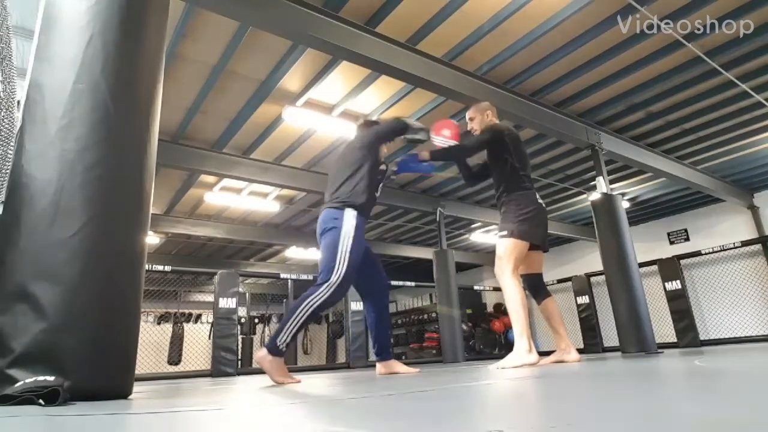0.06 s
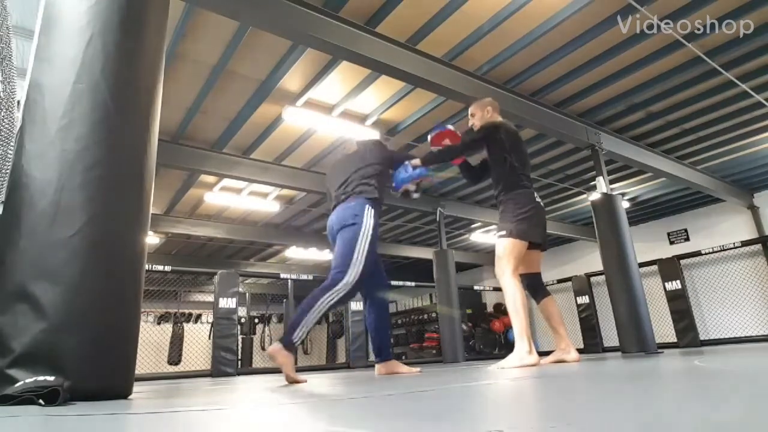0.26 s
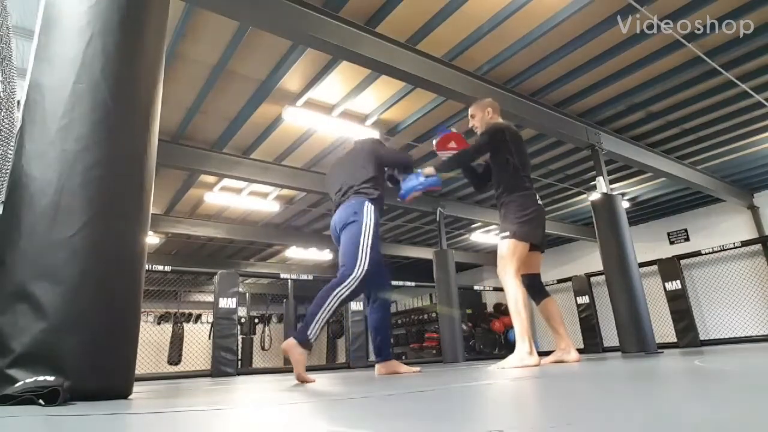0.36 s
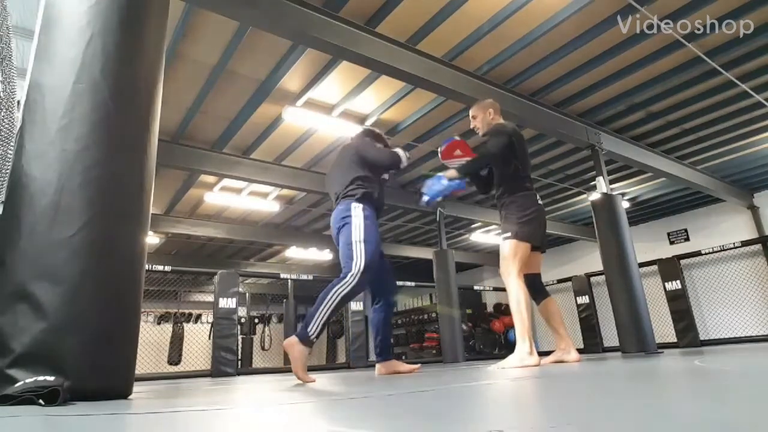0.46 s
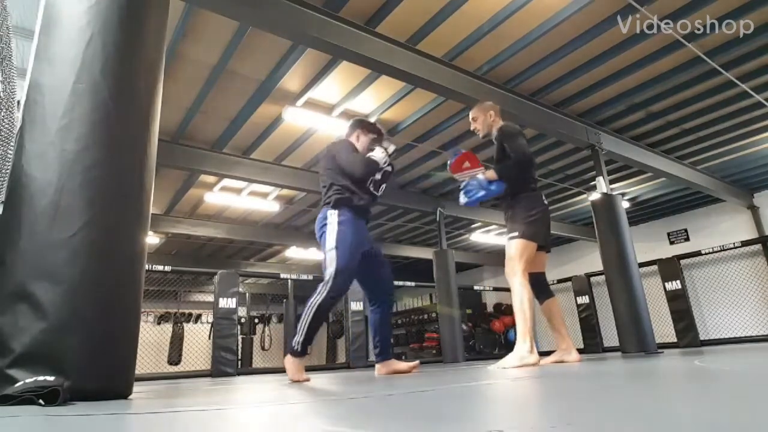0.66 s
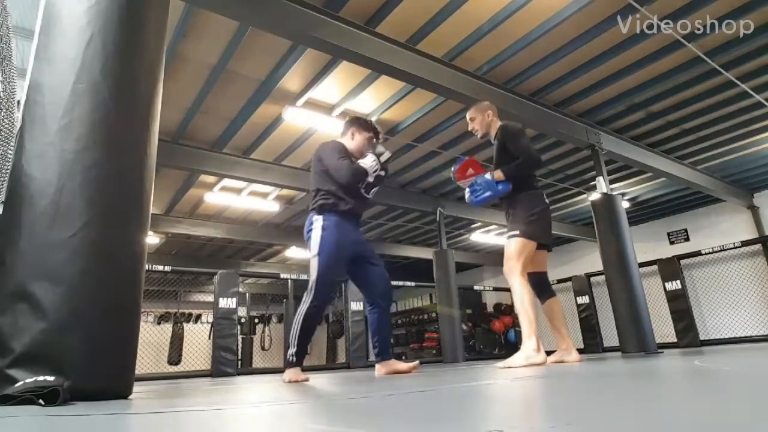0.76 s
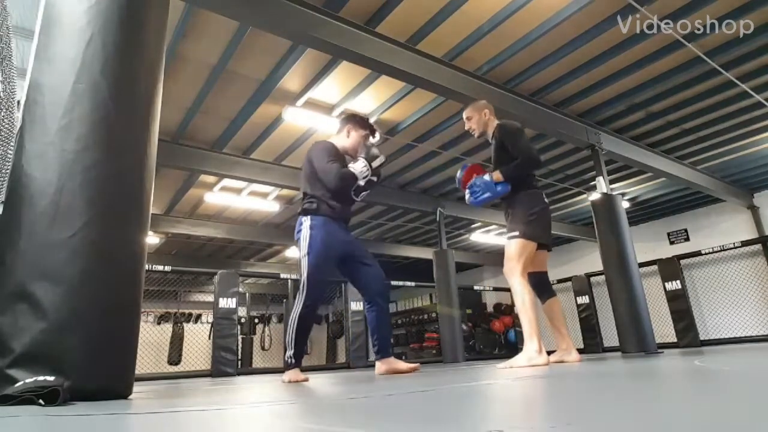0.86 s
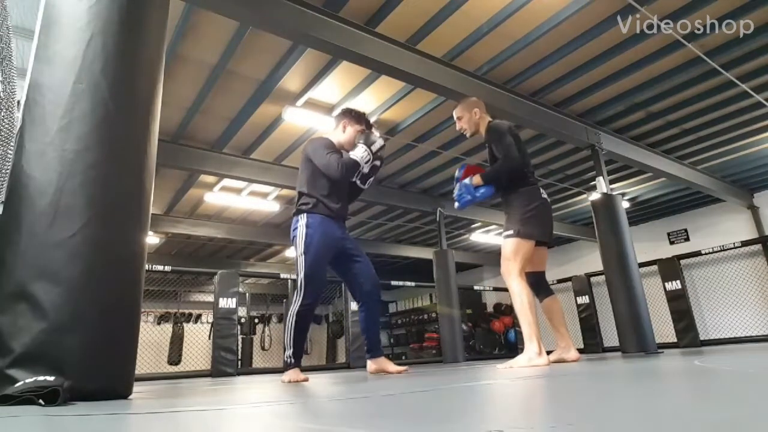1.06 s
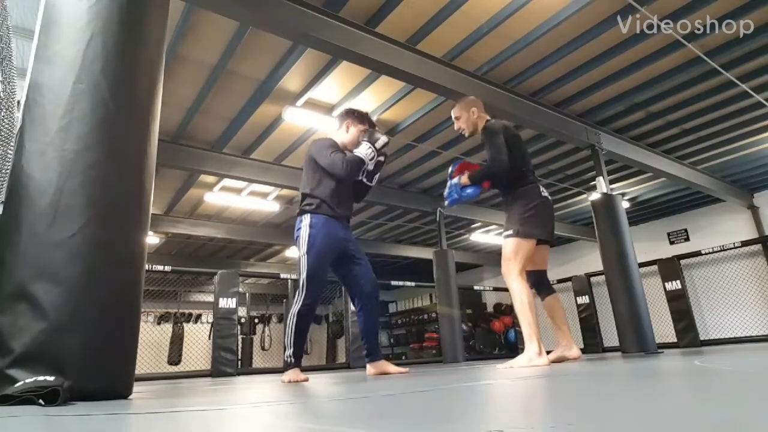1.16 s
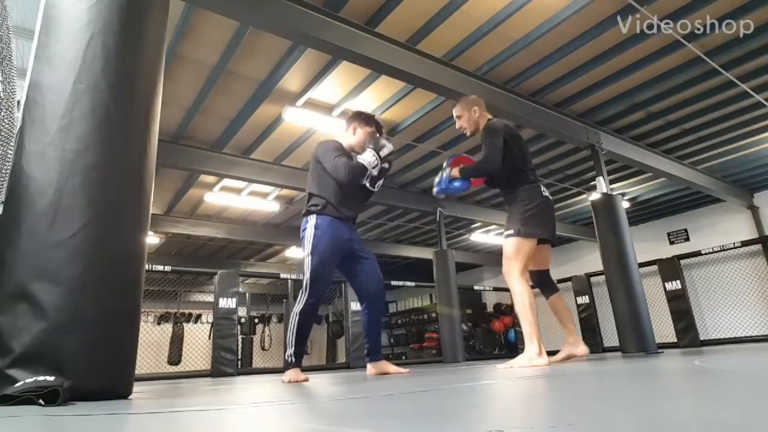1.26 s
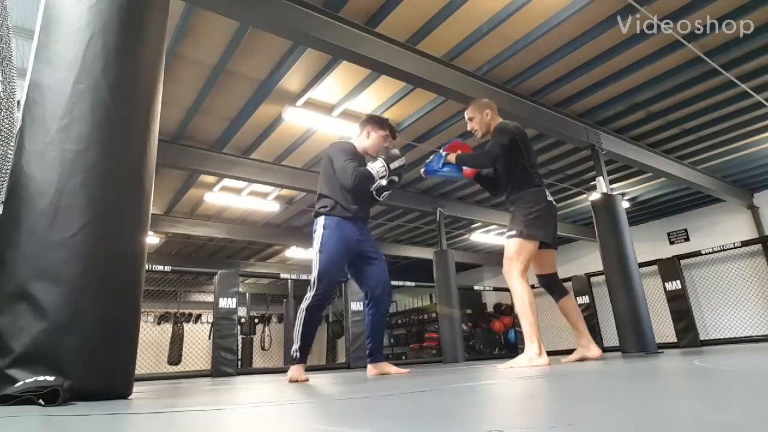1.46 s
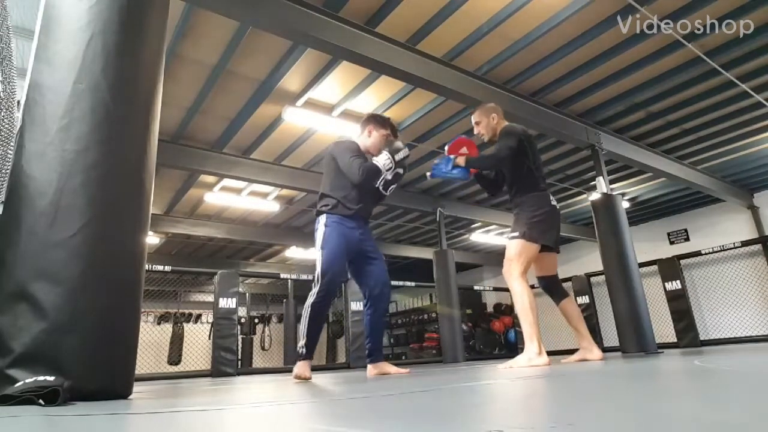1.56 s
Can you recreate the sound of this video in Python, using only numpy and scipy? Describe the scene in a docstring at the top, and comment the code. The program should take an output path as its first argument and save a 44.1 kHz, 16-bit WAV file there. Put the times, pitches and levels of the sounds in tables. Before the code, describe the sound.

A boxing glove smacks once into a padded mitt in an echoing gym, amid soft footwork.

```python
"""Bare feet pad and slide on a mat and clothes rustle over the low room noise of a large gym.
Then a boxing glove smacks once into a padded focus mitt, a few metres from a close pair of microphones
on the floor. The leather cracks, trapped air pops and the pad thumps; the roof throws the blow back and
the hall rings out. The footwork goes on, soles squeak, and the glove gives the mitt one light tap."""
import sys
import numpy as np
from scipy import signal
from scipy.fft import rfft, irfft
from scipy.io import wavfile
from scipy.ndimage import uniform_filter1d

SR = 44100
rng = np.random.default_rng(int(sys.argv[2]) if len(sys.argv) > 2 else 0)


def pcm_store(signal):
    """Save signal as 16-bit PCM."""
    levels = np.round(np.clip(np.atleast_2d(signal), -1, 1) * 32767)
    wavfile.write(sys.argv[1], SR, levels.astype(np.int16).T)


N = 70560
T = np.arange(N) / SR

# How alike the two microphones hear the room: freq_hz, correlation
MIC_LIKENESS = [(40, 1), (125, 0.85), (250, 0.91), (500, 0.66), (1000, 0.13), (2000, 0.09), (5000, 0),
                (16000, 0.13)]
# Balance of the pair: freq_hz, left_minus_right_db
MIC_BALANCE = [(60, 1.5), (250, 0.9), (1000, -.6), (2200, -2.5), (4000, -3), (8000, -2.2), (16000, 1.5)]
# Room noise and the hall's low drone: freq_hz, relative_db
ROOM_SPECTRUM = [(20, -16), (45, -2.5), (85, -4.5), (140, -3.5), (200, -6.5), (280, -4.5), (440, -17),
                 (620, -14), (1000, -23), (1350, -23), (1600, -32), (2100, -27.5), (3500, -35),
                 (6000, -41.5), (10000, -45.5), (15500, -39.5)]
DRONE_SPECTRUM = [(20, -25), (60, -12.5), (86, 0), (110, -11), (250, -45), (16000, -92)]
# Shifts of the body: centre_s, width_s, cloth_db, sole_rub_db
BODY_SHIFTS = [(0.009, 0.042, -58.5, -49), (0.112, .04, -61, -58), (0.193, 0.026, -60.5, -54.5),
               (0.843, .014, -62, -60), (0.918, 0.03, -66, -60.5), (1.031, 0.024, -70, -60.5),
               (1.104, 0.012, -89, -57.5), (1.212, 0.024, -67, -57.5), (1.307, 0.034, -80, -55),
               (1.353, 0.022, -59, -69), (1.434, 0.038, -62.5, -75), (1.513, 0.035, -55.5, -56.5),
               (1.59, 0.032, -61, -74)]
# Friction of cloth, and of soles on the mat: freq_hz, relative_db
CLOTH_SPECTRUM = [(100, -18), (500, 1.5), (1100, 8), (1700, -1), (3200, -1.5), (5500, -8.5), (11000, -13.5),
                  (16000, -16.5)]
RUB_SPECTRUM = [(150, -15), (420, -5.5), (660, -0.5), (850, -8), (1300, -14.5), (1700, -29), (16000, -57)]
# Footfalls on the mat: start_s, thud_db, pat_db, pat_hz, tick_db
FOOTFALLS = [(.006, -51, -42, 726, -52), (.021, -53, -40, 550, -68), (.085, -60, -41, 520, -73),
             (.832, -55, -40, 640, -53), (.844, -71, -46.5, 850, -58.5), (.849, -63, -40, 613, -72),
             (1.094, -54.5, -48.5, 560, -76), (1.1025, -63.5, -40, 676, -72),
             (1.206, -43.5, -44, 636, -53.5), (1.217, -48.5, -52, 674, -70), (1.4695, -60, -41, 922, -64),
             (1.4875, -45, -41, 883, -55), (1.4945, -59, -43.5, 1050, -58.5), (1.502, -56, -46.5, 590, -63),
             (1.528, -72, -41.5, 424, -52), (1.543, -46, -62, 602, -73), (1.5745, -56, -44.5, 1137, -68)]
# A footfall's thud and its tick of skin: freq_hz, relative_db
THUD_SPECTRUM = [(20, -32), (50, 2.5), (110, -15), (260, 1), (500, -15.5), (1500, -42), (16000, -85)]
TICK_SPECTRUM = [(300, -41), (1500, -9), (3000, 1.5), (5000, -17), (11000, -9), (16000, -15.5)]
# Squeaks of skin on vinyl: centre_s, pitch_hz, level_db
SOLE_SQUEAKS = [(1.22, 3620, -62), (1.33, 5800, -61.5), (1.342, 5100, -65)]
# The blow as the hall returns it: freq_hz, relative_db
HALL_SPECTRUM = [(25, -18), (65, -2.5), (105, -4.5), (135, 1), (200, -3), (400, -1.5), (520, -7.5),
                 (720, -9.5), (900, -0.5), (1300, -8.5), (1600, -23.5), (2100, -23), (3600, -25),
                 (4600, -30), (8000, -32), (12500, -35.5), (16000, -39)]
# Decay of the hall's main tail: freq_hz, t60_s
HALL_DECAY = [(60, 1), (140, 0.73), (400, 0.53), (900, 0.41), (2000, 0.62), (4000, 0.63), (8000, 0.47),
              (14000, 0.28)]
# Low modes of the hall: pitch_hz, level_db, t60_s
HALL_MODES = [(72, -25, .7), (136, -16, .65)]
# Strong roof slap, then the other first reflections: delay_s, level_db, lowpass_hz, right_lag_s
ROOF_SLAP = (.0142, -5.5, 4500, .00002)
EARLY_ECHOES = [(.0062, -16.5, 9000, .00005), (0.0227, -12, 3500, .0001), (0.0285, -18, 3000, -.0001),
                (0.0383, -20, 3000, -0.011)]
# Crack of the leather: freq_hz, relative_db
LEATHER_SPECTRUM = [(300, 3.5), (1000, 10.5), (2500, 6), (3800, 2), (5500, -2), (9000, -7.5), (12500, 1),
                    (16000, -18)]
# Pad and hollow of the mitt: pitch_hz, level_db, t60_s
MITT_MODES = [(136, -14.5, 0.066), (241, -6.5, 0.017), (904, -2, .012), (1830, -30, 0.0091)]

PUNCH_S, TAP_S, TAP_DB = .2442, 1.5205, -37
SLAP_S, POP_AFTER_S, POP_WIDTH_S, CREASE_HZ = .00016, .001285, .00037, 9700
HALL_DB, HALL_BUILD_S, HALL_HOLD_S = -15.5, .013, .036
LATE_DB, LATE_T60_RATIO = -13.5, 2.11  # far corners of the hall ring on longer


def amp(db):
    """Decibels to gain."""
    return 10 ** (np.asarray(db) / 20)


def curve_at(points, hz):
    """Reads a table on a log-frequency axis."""
    freqs, values = np.transpose(points)
    return np.interp(np.log(hz + 1), np.log(freqs + 1), values)


def delayed(x, delay_s):
    """Moves a sound later."""
    return np.interp(T - delay_s, T, x, left=0)


def decay(start_s, fall_s):
    """Sudden start, exponential fall."""
    return (T >= start_s) * np.exp(-np.maximum(T - start_s, 0) / fall_s)


def bell(centre_s, width_s):
    """Smooth rise and fall around a moment."""
    return np.exp(-((T - centre_s) / width_s) ** 2 / 2)


def noise(spectrum, grain_db=0):
    """Coloured, optionally grainy noise at rms 1, as two close microphones hear it in a room."""
    hz = np.fft.rfftfreq(N, 1 / SR)
    white = rng.standard_normal((2, N))
    grain = amp(grain_db * np.repeat(rng.standard_normal(N // 32 + 1), 32)[:N])
    mid, side = rfft(white * grain)
    likeness = np.clip(curve_at(MIC_LIKENESS, hz), -1, 1)
    mid, side = mid * np.sqrt(1 + likeness), side * np.sqrt(1 - likeness)
    lean = amp(curve_at(MIC_BALANCE, hz) / 2)
    pair = np.array([(mid + side) * lean, (mid - side) / lean])
    coloured = irfft(pair * amp(curve_at(spectrum, hz)), N)
    return coloured / np.sqrt(np.mean(coloured ** 2) + 1e-20)


def room_tone():
    """The gym's steady noise and low drone, far under the action."""
    return amp(-52.5) * noise(ROOM_SPECTRUM) + amp(-55.5) * noise(DRONE_SPECTRUM)


def in_hall(x, wet_db=-6.5, t60_s=.5):
    """Adds the hall's tail to the small sounds."""
    tail = noise([(20, 1.5), (5000, -11), (16000, -2.5)]) * amp(-60 * T / t60_s)
    tail /= np.linalg.norm(tail[0])
    return x + amp(wet_db) * signal.fftconvolve(x, tail, axes=1)[:, :N]


def rustle():
    """Grainy friction of cloth and of soles on the mat swells with each movement."""
    cloth = sum(amp(db) * bell(s, width) for s, width, db, _ in BODY_SHIFTS)
    rub = sum(amp(db) * bell(s, width) for s, width, _, db in BODY_SHIFTS)
    return cloth * noise(CLOTH_SPECTRUM, grain_db=2) + rub * noise(RUB_SPECTRUM, grain_db=2)


def squeaks(edge_ratio=1.13 ** 3):
    """A turning sole sticks and slips: brief, fuzzy squeaks of narrow-band noise."""
    out = np.zeros((2, N))
    for centre_s, hz, db in SOLE_SQUEAKS:
        band = [(hz / edge_ratio, -45), (hz, 0), (hz * edge_ratio, -45)]
        out += amp(db) * noise(band) * bell(centre_s, width_s=.0021)
    return out


def feet():
    """Each footfall is a soft thud, a hollow pat of a few cycles and a tick of skin on vinyl."""
    thud, pat, tick = np.zeros((3, N))
    for start_s, thud_db, pat_db, pat_hz, tick_db in FOOTFALLS:
        thud += amp(thud_db) * decay(start_s, fall_s=.013)
        hollow = np.sin(2 * np.pi * pat_hz * (start_s - T))
        pat += amp(pat_db) * bell(start_s + .00092, width_s=.001) * hollow
        tick += amp(tick_db) * (decay(start_s, fall_s=.0024) - decay(start_s, fall_s=.00035))
    soft_thud = uniform_filter1d(thud, size=130)
    return soft_thud * noise(THUD_SPECTRUM) + pat + tick * noise(TICK_SPECTRUM)


def reflections(x):
    """Dulled copies of a blow reach the microphones from roof, bags and walls."""
    out = np.zeros((2, N))
    for delay_s, db, lowpass_hz, right_lag_s in [ROOF_SLAP, *EARLY_ECHOES]:
        pole = np.exp(-2 * np.pi * lowpass_hz / SR)
        left, right = amp(db) * signal.lfilter([1 - pole], [1, -pole], x)
        out += [delayed(left, delay_s), delayed(right, delay_s + right_lag_s)]
    return out


def hall_ring(boom_rise_s=.014):
    """The diffuse tail builds, holds briefly and dies band by band over two low modes."""
    hz, t, bands = signal.stft(noise(HALL_SPECTRUM, grain_db=2), SR, nperseg=512, noverlap=384)
    fall_db = -60 * np.maximum(t - HALL_HOLD_S, 0) / curve_at(HALL_DECAY, hz)[:, None]
    bands *= np.hypot(amp(fall_db), amp(LATE_DB + fall_db / LATE_T60_RATIO))
    tail = signal.istft(bands, SR, nperseg=512, noverlap=384)[1][:, :N]
    build = 1 - np.exp(-(T / HALL_BUILD_S) ** 2)
    boom = sum(amp(db - 60 * T / t60) * np.sin(2 * np.pi * (mode_hz * T + rng.random()))
               for mode_hz, db, t60 in HALL_MODES)
    return amp(HALL_DB) * tail * build + boom * (1 - np.exp(-T / boom_rise_s))


def smack(pad_rise_s=.00023):
    """The covers slap, the air between them pops out, the pad rings, the leather cracks and creases."""
    slap_time, pop_time = T / SLAP_S, (T - POP_AFTER_S) / POP_WIDTH_S
    slap = -amp(-9.5) * slap_time ** 2 * np.exp(2 * (1 - slap_time))
    pop = amp(-3.5) * pop_time * np.exp((1 - pop_time ** 2) / 2)
    modes = sum(amp(db - 60 * T / t60) * np.sin(2 * np.pi * hz * T) for hz, db, t60 in MITT_MODES)
    pad = delayed(modes * (1 - np.exp(-T / pad_rise_s)), POP_AFTER_S)
    crack, crush = amp(-15.5) * decay(0, fall_s=.001), amp(-28) * decay(0, fall_s=.014)
    leather = noise(LEATHER_SPECTRUM) * (crack + crush)
    crease_band = [(CREASE_HZ / 2, -18), (CREASE_HZ, 0), (CREASE_HZ * 2, -18)]
    crease = amp(-26) * bell(centre_s=.0077, width_s=.0011) * noise(crease_band)  # as the pad gives
    return slap + pop + pad + leather + crease


def glove_tap():
    """A light tap of glove on mitt with its first reflections."""
    direct = smack()
    return amp(TAP_DB) * np.array([delayed(side, TAP_S) for side in direct + reflections(direct)])


def punch(shove_hz=63.5, shove_s=.0042):
    """The full blow from a few metres, with echoes, tail and a low shove as the mitt is driven back."""
    direct = smack()
    swell = T / shove_s * np.exp(1 - T / shove_s)
    shove = -amp(-18) * swell * np.sin(2 * np.pi * shove_hz * T)
    at_mics = direct + shove + reflections(direct) + hall_ring()
    return np.array([delayed(side, PUNCH_S) for side in at_mics])


def scene():
    """Footwork, glove tap and punch over the room tone, heard from the gym floor."""
    small_sounds = in_hall(feet() + squeaks() + rustle() + glove_tap())
    return small_sounds + punch() + room_tone()


def record(dry, ceiling=1.08, lowpass_hz=15900):
    """The peak of the blow overloads softly; then the highest treble is cut."""
    rounded = dry / (1 + (dry / ceiling) ** 6) ** (1 / 6)
    lowpass = signal.firwin(511, lowpass_hz, window=("kaiser", 9), fs=SR)
    return signal.oaconvolve(rounded, lowpass[None], "same")


dry = scene()
out = record(dry)
pcm_store(out)
```